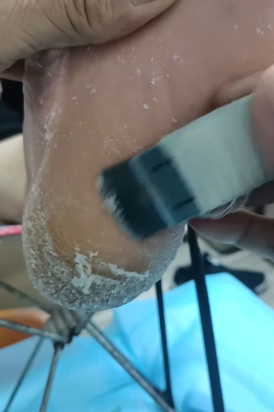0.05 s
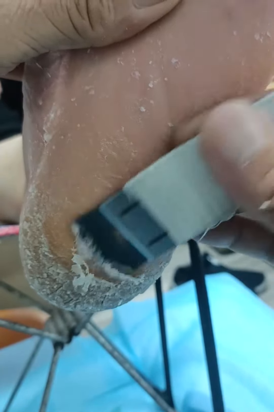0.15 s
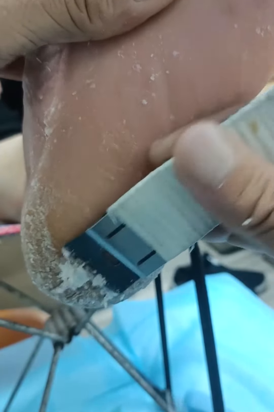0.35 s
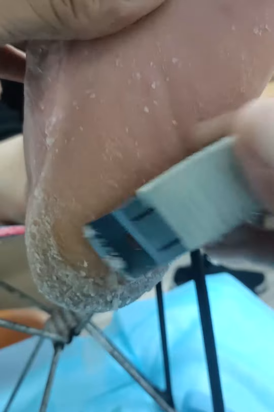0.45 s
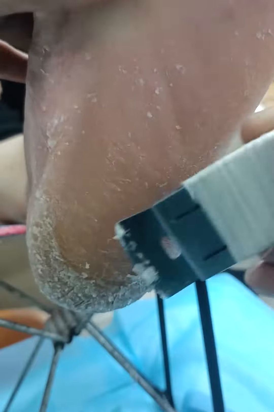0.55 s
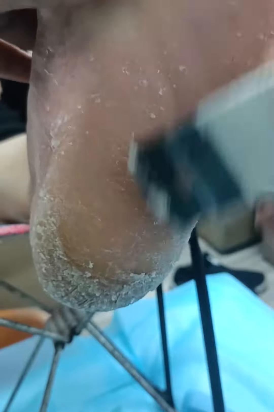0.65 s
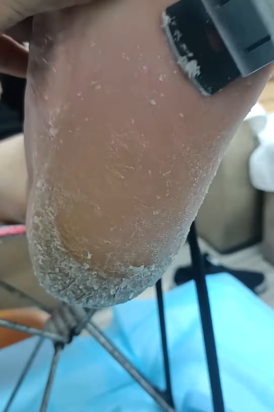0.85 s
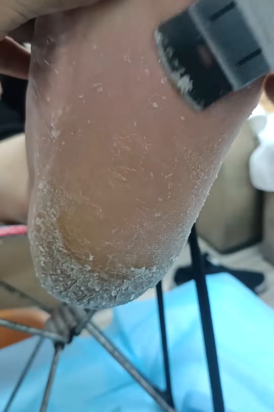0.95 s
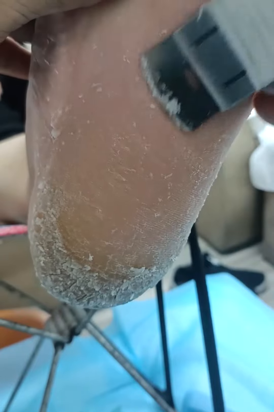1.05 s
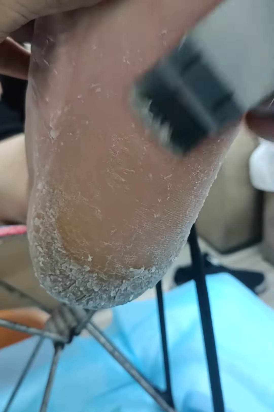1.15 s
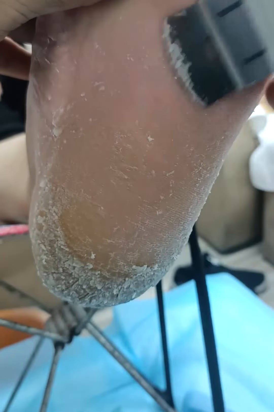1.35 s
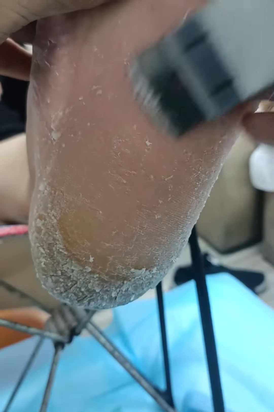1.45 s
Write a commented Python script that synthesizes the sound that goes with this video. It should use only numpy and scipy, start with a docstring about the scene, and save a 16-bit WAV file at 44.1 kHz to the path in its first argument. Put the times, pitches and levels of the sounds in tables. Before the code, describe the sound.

A blade scrapes hard, dry heel skin, close to a stereo microphone. After faint brushing, a crisp, gritty rasp with tiny snaps bursts at about 0.2 s, fading in a brief drag and short room ring. Light brushing passes near 0.6 s. A second crackly scrape, fuller in the middle range, comes at 0.77 s. Faint touches follow at 1.28 and 1.43 s over quiet air, wavering low hum and slight rumble.

```python
"""A blade scrapes hard, dry heel skin in two quick strokes, close to a pair of microphone ports in a small live room.
Each stroke is a dense burst of tiny fractures shaped by the blade's force; sharper snaps are short noise cracks.
The room rings on through shifting patterns of dense reflections. Around the strokes the blade brushes the skin lightly.
Under it lie soft room air (filtered noise), a wavering low hum with a faint early tone, and a faint narrow-band rumble."""
import sys
import numpy as np
from scipy import signal
from scipy.fft import rfft, irfft
from scipy.io import wavfile
from scipy.ndimage import uniform_filter1d

SR = 44100
rng = np.random.default_rng(int(sys.argv[2]) if len(sys.argv) > 2 else 0)


def put_to_file(sound):
    """Save the sound as 16-bit audio at rate SR, in the file named by the first command-line argument."""
    columns = np.atleast_2d(sound).T  # one column per channel
    safe = np.clip(columns, -1, 1)
    whole_steps = np.round(safe * 32767)
    wavfile.write(sys.argv[1], SR, whole_steps.astype(np.int16))


N = 66150


def amp(db):
    """Decibels to gain."""
    return 10 ** (np.asarray(db) / 20)


def unit(x):
    """Scales to rms 1."""
    return x / np.sqrt(np.mean(x ** 2) + 1e-20)


def read(points, hz):
    """Reads a table on a log-frequency axis."""
    f, value = np.transpose(points)
    return np.interp(np.log(hz + 1), np.log(f + 1), value)


def colour(x, curve_db):
    """Minimum-phase filter whose gain in dB is a function of frequency."""
    size = 4096
    hz = abs(np.fft.fftfreq(size, 1 / SR))
    log_gain = np.log(amp(curve_db(hz)))
    response = np.exp(np.conj(signal.hilbert(log_gain)))
    taps = np.fft.ifft(response).real[:size // 2]
    return signal.fftconvolve(x, taps)[:len(x)]


def tint(x, points):
    """Colours a sound by a table of hz, gain_db."""
    return colour(x, lambda hz: read(points, hz))


def pan(x, left_db):
    """Sets the left-over-right level difference; the right port hears the sound slightly later."""
    right_lag_s = 0.00023
    late = np.roll(x, round(right_lag_s * SR))
    return np.array([x * amp(left_db / 2), late * amp(-left_db / 2)])


def drift(rate_hz):
    """Slow random motion of rms 1: noise under a Gaussian low-pass."""
    lowpass = np.exp(-(np.fft.rfftfreq(N, 1 / SR) / rate_hz) ** 2)
    return unit(irfft(rfft(rng.standard_normal(N)) * lowpass, N))


def cracks(per_s):
    """A dense train of tiny fractures of uneven size, with steady mean power."""
    spread_db = 1.5
    size = amp(spread_db * np.minimum(rng.exponential(1, N), 4)) * rng.choice([-1, 1], N)
    train = size * (rng.random(N) < per_s / SR)
    power = abs(uniform_filter1d(train ** 2, size=200))
    return train / np.sqrt(power + 1e-6)


def air():
    """Steady room air: coloured noise, most alike in the two ports around 250 Hz."""
    # noise spectrum before rms scaling: hz, density_db_per_hz
    air_colour = [(25, -25.5), (60, -1), (130, -10), (250, 2), (400, -4.5), (850, -2.5), (1150, -3.5),
                  (1550, 0), (2100, -8.5), (3500, -13.5), (5500, -19.5), (8000, -24), (11500, -16.5),
                  (13000, -67), (16000, -40)]
    # left-right correlation: hz, likeness (0 to 1)
    likeness = [(50, 0), (250, 1), (600, 0.14), (1500, 0), (8000, 0.088)]
    level_db = -66
    hz = np.fft.rfftfreq(N, 1 / SR)
    a, b = rfft(rng.standard_normal((2, N)))
    same = np.clip(read(likeness, hz), -1, 1)
    right = same * a + np.sqrt(1 - same ** 2) * b
    noise = irfft(np.array([a, right]) * amp(read(air_colour, hz)), N)
    return amp(level_db) * unit(noise)


def rumble():
    """A soft narrow band of low noise comes and goes, like a distant rumble in the room."""
    # rumble envelope: time_s, level_db
    rumble_level = [(0.0, -78), (0.136, -82.5), (0.166, -68.5), (0.274, -61.5), (0.342, -68.5),
                    (0.358, -64.5), (0.376, -59.5), (0.438, -80), (0.654, -75), (0.752, -79.5),
                    (0.826, -64.5), (1.01, -92.5), (1.076, -71.5), (1.106, -89.5), (1.244, -79), (1.5, -91)]
    centre_hz, width_hz = 145, 32
    t = np.arange(N) / SR
    band = (drift(width_hz) + 1j * drift(width_hz)) * np.exp(2j * np.pi * centre_hz * t)
    level = amp(np.interp(t, *np.transpose(rumble_level)))
    return pan(unit(band.real) * level, 0)


def hum():
    """A low sine wavers in pitch and level, swells and fades; a faint higher tone dies out early on."""
    # hum envelope before the trim: time_s, level_db
    hum_level = [(0.0, -67), (0.02, -61), (0.136, -75), (0.2, -72), (0.324, -84), (0.376, -61.5),
                 (0.43, -64), (0.48, -80.5), (0.554, -68.5), (0.584, -87), (0.646, -55.5), (0.768, -68),
                 (0.826, -50.5), (0.914, -81), (1.048, -73.5), (1.278, -91), (1.486, -83), (1.5, -81)]
    hum_hz, swing_hz, waver_hz, flutter, trim_db = 234, 8, 22, 0.25, -0.5
    faint_middle_s, faint_sigma_s, faint_hz, faint_db = 0.06, 0.055, 450, -70
    t = np.arange(N) / SR

    swell = np.exp(-0.5 * ((t - faint_middle_s) / faint_sigma_s) ** 2)
    faint = amp(faint_db) * swell * np.sin(2 * np.pi * faint_hz * t)

    pitch_hz = hum_hz + swing_hz * drift(waver_hz)
    tone = np.sin(2 * np.pi * np.cumsum(pitch_hz) / SR)
    wavering = unit(tone * (1 + flutter * drift(waver_hz)))
    level = amp(trim_db + np.interp(t, *np.transpose(hum_level)))
    return pan(faint + level * wavering, 0)


def brushes():
    """The blade slides without biting: soft Gaussian swells of fine, bright grains."""
    # light touches: middle_s, sigma_s, level_db (before colour), left_over_right_db
    touches = [(0.09, .09, -73, 9), (0.209, 0.045, -63.5, 8), (0.605, .07, -71, 9),
               (1.276, 0.017, -62.5, 8), (1.429, 0.018, -64.5, 8)]
    # grain colour: hz, gain_db
    brush_colour = [(300, -11), (2500, -21), (3400, -2), (4100, 0.5), (5300, -16), (6600, -15.5),
                    (8000, 10.5), (9500, 5.5), (11500, 10), (16000, -3)]
    cracks_per_s = 2400
    t, out = np.arange(N) / SR, np.zeros((2, N))
    for middle_s, sigma_s, db, left_db in touches:
        touch = amp(db) * np.exp(-0.5 * ((t - middle_s) / sigma_s) ** 2)
        out += pan(tint(cracks(cracks_per_s) * touch, brush_colour), left_db)
    return out


def snaps():
    """Larger flakes break with one very short, decaying noise crack each."""
    # flakes snapping off: start_s, energy_db (before colour)
    flakes = [(.1953, -19), (.2097, -13), (0.2176, -25), (0.7697, -14.5), (0.7768, -17), (0.784, -13.5),
              (0.794, -27), (0.7975, -39), (0.8083, -26)]
    # crack colour: hz, gain_db
    snap_colour = [(200, -40.5), (550, -33), (1000, -18), (3000, -6.5), (7000, -0.5), (11000, -5),
                   (16000, -22)]
    decay_s, left_over_right_db = 0.00088, 18.5
    out = np.zeros(N)
    for start_s, db in flakes:
        t = np.arange(N) / SR - start_s
        crack = rng.standard_normal(N) * (t >= 0) * np.exp(-abs(t) / decay_s)
        out += amp(db) * crack / np.linalg.norm(crack)
    return pan(tint(out, snap_colour), left_over_right_db)


def scrapes():
    """The edge settles and bites, force builds until the flake lets go, and a weak drag follows."""
    # strokes: bite_s, rise_s, level_db (before colour), left_over_right_db, drag_db, drag_decay_s
    strokes = [(.197, .013, -26, 3, -15.5, 0.059), (.772, 0.0098, -26.5, 2.5, -14, 0.037)]
    # skin colour under the blade: hz, first_stroke_db, second_stroke_db
    skin_colour = [(101.2, -39.5, -24.5), (504, -17, -40.5), (623, -24, -14.5), (813, -6.5, -4),
                   (1050, -15, 3), (1389, -5.5, 3), (1920, -3.5, -3), (2440, 3, 1), (3340, 1.5, -2),
                   (4230, 3, -0.5), (6200, -5, -4), (7500, -4.5, -1.5), (10820, 1.5, -6.5),
                   (12160, -7, -4.5), (16200, -9.5, -8.5)]
    cracks_per_s = 4600
    touch_db, touch_s = -4.5, 0.0025  # extra cut just before the bite, deeper the earlier
    bite_db, release_s = -10, 0.0035  # force at the bite relative to its peak; decay after the peak
    out, skin = np.zeros((2, N)), np.array(skin_colour)
    for k, (bite_s, rise_s, db, left_db, drag_db, drag_s) in enumerate(strokes):
        t = np.arange(N) / SR - bite_s
        after = np.maximum(t - rise_s, 0)
        touch = np.where(t > 0, 1, amp(touch_db) * np.exp(-abs(t) / touch_s))
        build = touch * amp(bite_db * np.clip(1 - t / rise_s, 0, 1))
        release = np.exp(-after / release_s)
        drag = amp(drag_db) * np.exp(-after / drag_s)
        force = build * (release + drag)
        rasp = cracks(cracks_per_s) * force * amp(db)
        out += pan(tint(rasp, skin[:, [0, k + 1]]), left_db)
    return out


def reflections():
    """Dense reflections build up, then each band dies away at its own rate; unit energy per port."""
    # room decay: hz, t60_s
    room_t60 = [(200, .28), (600, 0.25), (1000, 0.31), (3000, 0.38), (7000, .37), (10000, 0.34),
                (15000, 0.26)]
    build_s, gap_s = 0.0031, 0.001
    t = np.arange(SR) / SR
    build = 1 - np.exp(-np.maximum(t - gap_s, 0) / build_s)
    taps = rng.standard_normal((2, SR)) * build
    hz, when_s, z = signal.stft(taps, SR, nperseg=256)
    decay = amp(-60 * when_s / read(room_t60, hz)[:, None])
    tail = signal.istft(z * decay, SR, nperseg=256)[1]
    return tail / np.linalg.norm(tail, axis=1, keepdims=True)


def room(x, count=6):
    """The travelling edge feeds overlapping patterns of reflections in turn, round and round."""
    level_db, cycle_hz = 3.5, 69.57  # cycle: once through all the patterns
    place, out = np.arange(N) / SR * cycle_hz * count, np.zeros((2, N))
    for k in range(count):
        share = np.sin(np.pi / 2 * np.minimum((place - k) % count, 2))
        out += signal.fftconvolve(x * share, reflections(), axes=1)[:, :N]
    return amp(level_db) * out


def scene():
    """Blade and skin, direct and in the room, over air, hum and rumble; the snaps feed the room less."""
    snap_room_db = -8
    background = air() + rumble() + hum()
    rasp, snap = scrapes(), snaps()
    ringing = room(rasp + amp(snap_room_db) * snap)
    return background + brushes() + ringing + snap + rasp


def port(x, centre_hz, width_hz, lift_db, shelf_db, bell_db):
    """A microphone port rings in the treble, has a second bell there and dulls the very top."""
    bell_hz, bell_width_hz, shelf_hz = 10050, 1800, 8900

    def bell(hz, centre, width):
        """Resonance shape, 1 at the centre and half that at the edges of its width."""
        return 1 / (1 + (2 * (hz - centre) / width) ** 2)

    def curve_db(hz):
        """Sum of resonance, second bell and treble shelf."""
        resonance = lift_db * bell(hz, centre_hz, width_hz)
        second = bell_db * bell(hz, bell_hz, bell_width_hz)
        shelf = shelf_db / (1 + (shelf_hz / (hz + 1)) ** 8)
        return resonance + second + shelf

    return colour(x, curve_db)


def suppress(x):
    """Mild noise suppressor: turns down time-frequency regions of low power density."""
    max_cut_db, threshold_db_per_hz = -6.5, -102  # half the cut in dB at the threshold
    z = signal.stft(x, SR, nperseg=512, noverlap=384, scaling="psd")[2]
    power = uniform_filter1d(2 * abs(z) ** 2, size=3, axis=1)  # across bins
    power = uniform_filter1d(power, size=7, axis=2)  # across frames
    gain = amp(max_cut_db / (1 + abs(power) / amp(threshold_db_per_hz) ** 2))
    return signal.istft(z * gain, SR, nperseg=512, noverlap=384, scaling="psd")[1][:, :N]


def record(dry):
    """Each port adds its own colour; then mild noise suppression and a low-pass band limit."""
    # ports, left then right: resonance_hz, width_hz, lift_db, treble_shelf_db, second_bell_db
    ports = [(6804, 1750, 18, -7, -5.5), (9040, 3200, 8.5, -1.5, 2.5)]
    edge_hz = 15800
    heard = suppress(np.array([port(x, *row) for x, row in zip(dry, ports)]))
    lowpass = signal.firwin(511, edge_hz, window=("kaiser", 9), fs=SR)
    return signal.oaconvolve(heard, lowpass[None], "same")


dry = scene()
out = record(dry)
put_to_file(out)
```